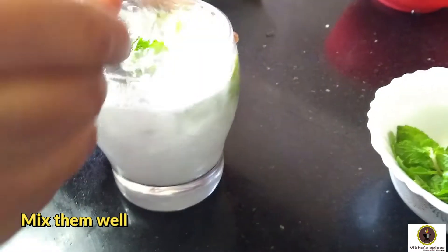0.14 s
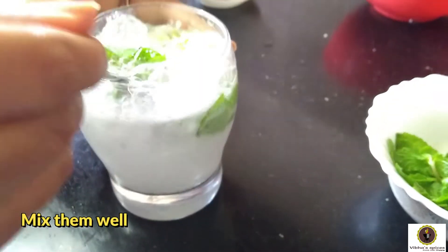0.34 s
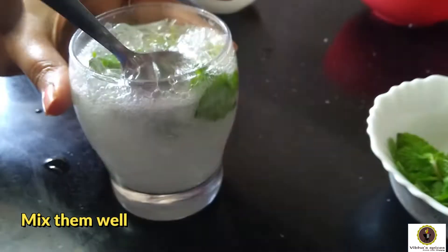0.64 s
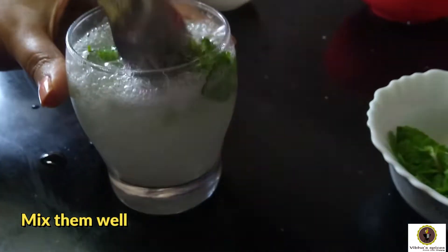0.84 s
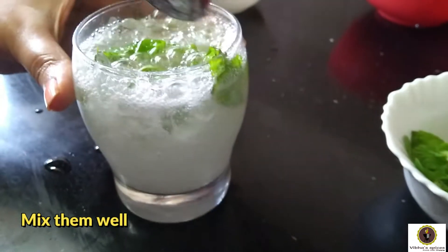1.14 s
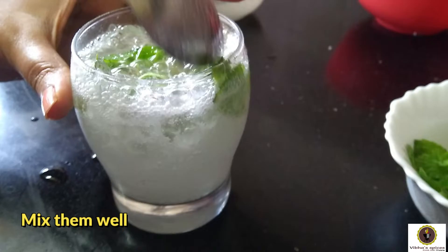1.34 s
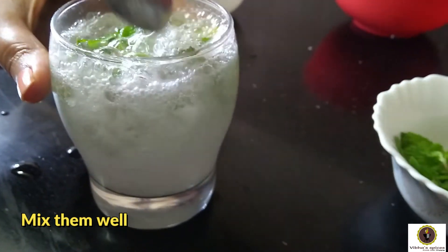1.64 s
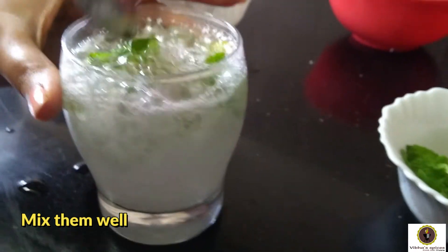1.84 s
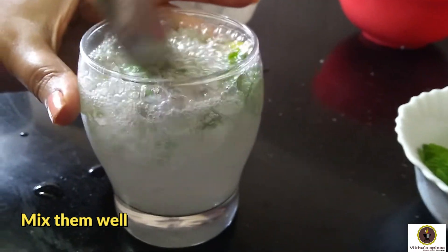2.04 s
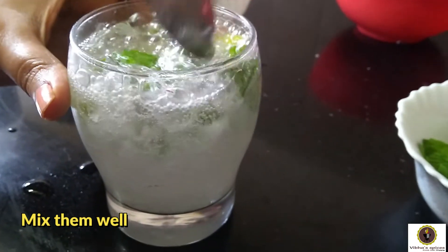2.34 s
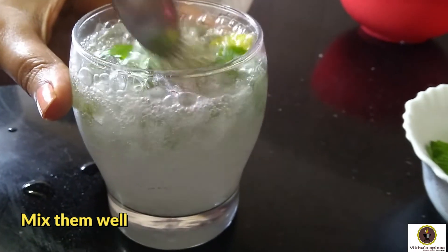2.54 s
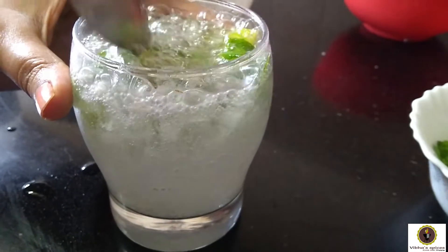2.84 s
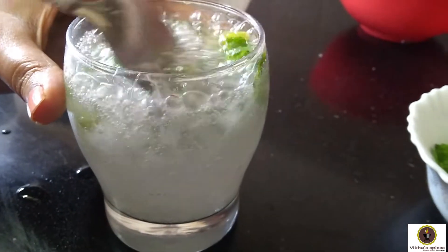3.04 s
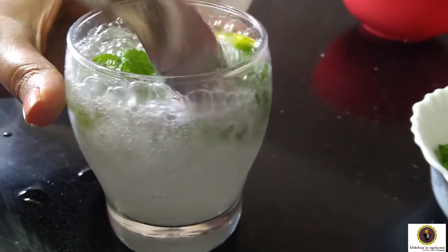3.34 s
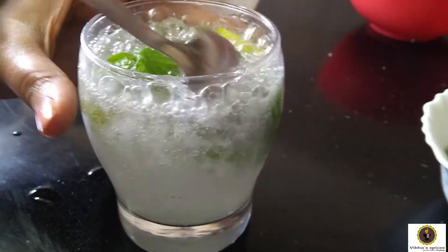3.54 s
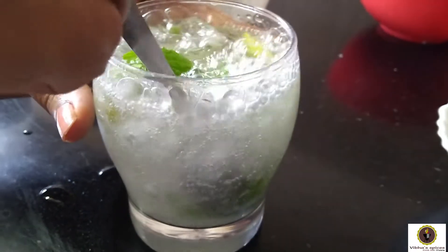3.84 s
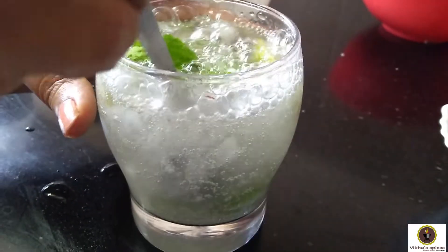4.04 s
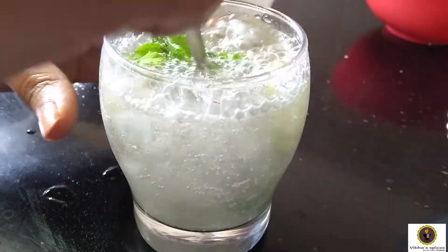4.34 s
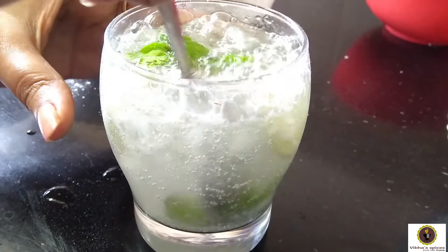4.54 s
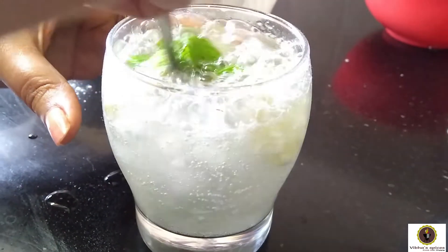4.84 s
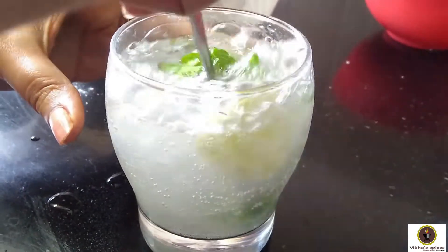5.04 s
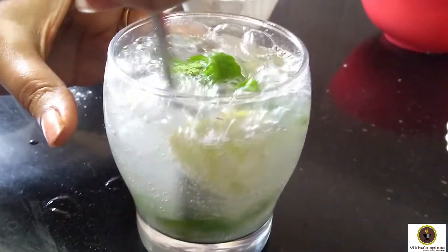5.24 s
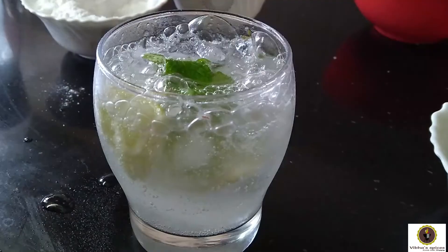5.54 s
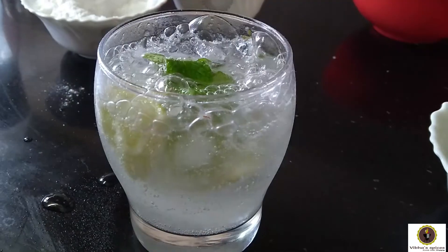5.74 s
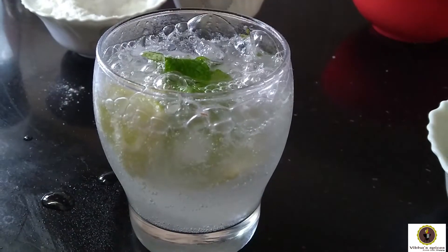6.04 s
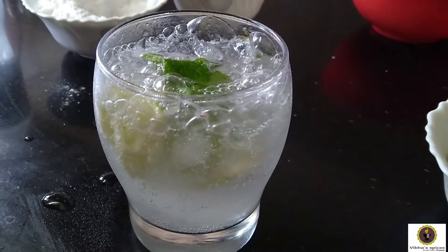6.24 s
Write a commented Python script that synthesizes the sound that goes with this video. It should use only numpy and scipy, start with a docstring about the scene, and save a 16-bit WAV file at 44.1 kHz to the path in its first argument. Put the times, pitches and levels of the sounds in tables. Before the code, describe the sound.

From 0 s a metal spoon pushes through ice and soda in a full glass, very close, with crisp crunching, bubbly slosh and a few clinks, the sharpest near 0.5 and 0.8 s. Foam fizzes constantly in tiny irregular pops over a low wavering hum and rumble. After a calmer second, a tight rattle of ice clinks comes at 1.4-1.5 s, then gulping liquid around 1.9 s, another cluster at 2.4 s and a prominent hard clink at 2.86 s. Rapid small knocks follow at 3.25 s; dull, heavy ice thuds mix with bright clinks at 3.7 and 4.1-4.3 s. A brief thinner spell near 4.5 s gives way to frequent short clinks from 4.75 s onward. A strong low bump lands at 5.41 s, fizz surging; at 5.5 s everything drops abruptly to faint, thin fizz with single pops and soft hum until about 6.4 s.

```python
"""On a kitchen counter, a metal spoon stirs ice, mint and soda in a hand-held glass close to the microphones.
Foam fizzes as random damped pops, ice crunches in crisp ticks and knocks dully on the full glass as short blows
and rings; bubbles slosh and the drink gurgles as longer damped tones, over a low hum of filtered noise. At 5.5
s the scene changes abruptly to the faint fizz of a drink left alone. The recorder widens the stereo image."""
import sys
import numpy as np
from scipy import signal
from scipy.fft import rfft, irfft, next_fast_len
from scipy.io import wavfile
from scipy.ndimage import uniform_filter1d

SR = 44100
rng = np.random.default_rng(int(sys.argv[2]) if len(sys.argv) > 2 else 0)


def wav_record(signal):
    """Record a signal, one row per channel, as 16-bit PCM in the file named by sys.argv[1]."""
    frames = np.transpose(np.atleast_2d(signal))
    bounded = np.clip(frames, -1, 1)
    # unit amplitude maps onto the largest positive 16-bit level
    quanta = np.round(bounded * 32767).astype(np.int16)
    wavfile.write(sys.argv[1], SR, quanta)


N = 282240
TIME = np.arange(N) / SR
DROP_S = 5.495  # the scene changes abruptly to the resting drink
BLUR_DB = -2  # pops too small to tell apart, against the distinct ones


def amp(db):
    """Decibels to gain."""
    return 10 ** (np.asarray(db) / 20)


def unit(x):
    """Scales to rms 1."""
    return x / np.sqrt(np.mean(x ** 2) + 1e-20)


def read(points, hz):
    """Reads a spectrum on a log-frequency axis."""
    f, value = np.transpose(points)
    return np.interp(np.log(hz + 1), np.log(f + 1), value)


def level(table, axis):
    """Gain over time from one dB column of a curve."""
    columns = np.transpose(table)
    return amp(np.interp(TIME, columns[0], columns[axis]))


def add(mix, s, sound):
    """Mixes a sound into both channels at a time in seconds."""
    part = mix[:, max(round(s * SR), 0):][:, :sound.shape[1]]
    part += sound[:, :part.shape[1]]


def colour(x, points, size=2048):
    """Causal (minimum-phase) filter with the given spectrum, built by folding its cepstrum."""
    cepstrum = irfft(np.log(amp(read(points, np.fft.rfftfreq(size, 1 / SR)))))
    cepstrum[1:size // 2] *= 2
    cepstrum[size // 2 + 1:] = 0
    response = irfft(np.exp(rfft(cepstrum)))
    return signal.oaconvolve(x, response[None], axes=1)[:, :x.shape[1]]


def resonate(x, hz, width):
    """A resonance of gain 1 that can follow a pitch curve: shift to 0 Hz, smooth, shift back."""
    turn = np.exp(2j * np.pi * np.cumsum(hz * np.ones(N)) / SR)
    r = np.exp(-np.pi * abs(width) / SR)
    smoothed = signal.lfilter([1 - r], [1, -r], x / turn)
    return 2 * (turn * smoothed).real


def hiss():
    """Stereo white noise: countless pops too small to tell apart, or raw material for hum and room tone."""
    return rng.standard_normal((2, N))


def grains(per_s, spread_db, low_hz, high_hz, cycles, rise, count=28, size=2048):
    """Random bubbles of many sizes: damped tones, some rising in pitch, with its own phase at each microphone."""
    t, out = np.arange(size) / SR, np.zeros((2, N))
    for hz in np.geomspace(low_hz, high_hz, count):
        chance, strength, phase = rng.random(N), rng.exponential(1, N), rng.random((2, 1))
        born = np.flatnonzero(chance < per_s / count / SR)
        train = np.zeros(N)
        train[born] = amp(spread_db * np.minimum(strength[born], 4))
        age = hz * t / cycles
        turns = hz * t * (1 + rise * np.minimum(age, 6)) + phase
        pop = np.exp(-age) * (1 - np.exp(-2 * hz * t)) * np.sin(2 * np.pi * turns)
        out += signal.oaconvolve(train[None], pop * hz, axes=1)[:, :N]
    return unit(out)


def clumps(depth_db, hz=35):
    """Bubbles burst in bunches: a gain that wanders at random."""
    knots = np.arange(0, 8, 1 / hz)
    return amp(depth_db * np.interp(TIME, knots, rng.standard_normal(4096)[:len(knots)]))


def swells(rows, width_hz):
    """Narrow bands of noise around a pitch that swell and fade as half a sine."""
    out = np.zeros((2, N))
    for s, length, db, hz in rows:
        t = np.arange(0, length, 1 / SR)
        band = np.exp(-((np.fft.rfftfreq(SR, 1 / SR) - hz) / (width_hz / 2)) ** 2 / 2)
        churn = unit(irfft(rfft(rng.standard_normal(SR)) * band)[:len(t)])
        add(out, s, (amp(db) * np.sin(np.pi * t / length) * churn)[None])
    return out


def room_floor(floor_db=-65.5):
    """The room's steady floor: noise weighted to the bass."""
    # spectrum of the room tone: f/Hz, level/dB
    floor_spectrum = [(20, 4), (60, -5), (130, 6), (250, -6), (500, -4.5), (1000, -17), (3000, -10),
                      (15000, -34)]
    return amp(floor_db) * unit(colour(hiss(), floor_spectrum))


def rumble(rumble_db=-8.5):
    """A dull rumble: noise with little above the bass."""
    # spectrum of the rumble: f/Hz, level/dB
    rumble_spectrum = [(20, -5.5), (60, -2), (250, -13), (600, -31.5), (3000, -41)]
    return amp(rumble_db) * unit(colour(hiss(), rumble_spectrum))


def hum():
    """A low, wavering hum: noise through narrow resonances, each passed twice for steeper skirts."""
    # resonances of the low hum: f/Hz, width/Hz, level/dB
    resonances = [(97, 4.3, -2.5), (126, 5.7, 0.5), (149.5, 22.3, -2), (167, 36, -12)]
    total = 0
    for hz, width, db in resonances:
        one_pass = 1.48 * width  # two wider passes in a row narrow to about this width
        total = total + amp(db) * unit(resonate(resonate(hiss(), hz, one_pass), hz, one_pass))
    return unit(total)


def resting(fizz_db=9.5, hum_db=11.5, clump_db=1.3):
    """The drink left alone: a thin fizz with single pops, over hum and faint tones."""
    # the resting drink, before the fizz and hum trims: t/s, fizz level/dB, hum level/dB
    rest_levels = [(5.52, -70.5, -96), (5.69, -69.5, -97), (5.76, -66, -74), (5.9, -66, -68),
                   (6.03, -65, -80), (6.16, -70.5, -80), (6.21, -67.5, -65), (6.4, -67.5, -64)]
    # spectrum of the resting fizz: f/Hz, level/dB
    rest_spectrum = [(200, -30), (450, 0), (700, -11), (1150, -6), (1400, -2), (1650, -10), (1900, -14),
                     (2600, -5), (3500, -17), (4500, 2), (5600, 3.5), (7000, 1.5), (9500, -4.5),
                     (12000, -14.5), (15000, -25)]
    # faint tones that come and go behind it: t/s, length/s, level/dB, f/Hz
    faint_tones = [(5.80, .12, -76, 1010), (5.92, 0.091, -75, 950), (5.93, 0.22, -71, 1370),
                   (5.98, .14, -68.5, 452), (6.22, 0.046, -70, 460), (6.34, .08, -74, 543)]
    pops = grains(per_s=2000, spread_db=1.5, low_hz=2400, high_hz=15700, cycles=4.3, rise=0.0081)
    foam = unit(colour(pops + amp(BLUR_DB) * hiss(), rest_spectrum))
    background = amp(hum_db) * level(rest_levels, axis=2) * hum() + swells(faint_tones, width_hz=67)
    return amp(fizz_db) * level(rest_levels, axis=1) * clumps(clump_db) * foam + background


def kitchen(x, room_db=-9.0, t60=0.27):
    """Sparse reflections from counter and walls, random at each microphone and dying away over t60 seconds."""
    t = np.arange(SR // 3) / SR
    sparse = rng.standard_normal((2, len(t))) * (rng.random((2, len(t))) < .06)
    taps = sparse * (t > .004) * amp(-60 * t / t60)
    taps /= np.linalg.norm(taps, axis=1, keepdims=True)
    return x + amp(room_db) * signal.oaconvolve(x, taps, axes=1)[:, :N]


def glass(x):
    """The glass rings on faintly after everything that happens in it."""
    # what the full glass rings with, whatever stirs it: f/Hz, width/Hz, level/dB
    glass_rings = [(363, 7, 10), (389, 7, 13), (485, 16, 5), (804, 10, 1), (874, 10, -1), (1103, 18, 1),
                   (1490, 30, -7), (1717, 30, -14), (2558, 30, -9), (3323, 30, -9), (5403, 80, -16)]
    return x + sum(amp(db) * resonate(x, hz, width) for hz, width, db in glass_rings)


def pushes(part, axis, start_s=0.018):
    """Gain over time of one part of the drink: each push rises, holds while the spoon moves, then settles."""
    # pushes of the spoon: t/s, length/s, ice crunch level/dB, slosh level/dB, gurgle level/dB
    strokes = [(0.0, 0.24, -38.5, -48, -82), (0.132, 0.17, -35.5, -44.5, -73.5),
               (0.442, 0.29, -42.5, -47.5, -55.5), (0.74, 0.12, -42, -43.5, -53),
               (0.931, 0.095, -39.5, -87.5, -54), (1.38, 0.13, -31.5, -43.5, -53.5),
               (1.51, 0.21, -40, -48.5, -61), (1.661, 0.079, -36.5, -41, -51),
               (1.852, 0.16, -39.5, -46.5, -54), (1.993, 0.65, -46.5, -51.5, -64.5),
               (2.385, 0.085, -32, -40.5, -55), (2.486, 0.22, -49, -51.5, -55.5),
               (2.796, 0.16, -38, -50, -52.5), (2.986, 0.067, -32.5, -47, -50),
               (3.234, 0.039, -31.5, -47.5, -54.5), (3.314, 0.21, -42, -43, -62),
               (3.58, 0.1, -40, -46, -59), (3.683, 0.097, -35, -46.5, -50.5),
               (4.067, 0.15, -33.5, -39, -63), (4.18, 0.11, -48, -42.5, -64), (4.37, 0.13, -88, -78, -54.5),
               (4.709, 0.052, -40, -49.5, -52.5), (4.805, 0.042, -35, -45.5, -67),
               (4.948, 0.13, -36, -40, -69), (5.13, 0.1, -38, -47, -82), (5.29, 0.078, -35, -41, -56),
               (5.416, 0.029, -31, -36, -43.5)]
    idle_db, settle_db_per_s = part
    power = np.full(N, amp(idle_db) ** 2)
    for row in strokes:
        age = TIME - row[0]
        going = np.clip(age / start_s, 0, 1)  # the spoon takes start_s to get going
        settled_db = settle_db_per_s * np.maximum(age - row[1], 0)
        power += (going * amp(row[1 + axis] - settled_db)) ** 2
    return np.sqrt(power)


def gulps(rise=0.25):
    """Now and then the spoon sets off a low, damped note that rises slightly in pitch."""
    # gulps and dull bumps as the spoon pushes through: t/s, level/dB, starting f/Hz, t60/s
    bumps = [(0.07, -51.5, 786, 0.5), (0.52, -41, 489.4, 0.055), (1.92, -41, 630, 0.041),
             (2.406, -32.5, 329, 0.075), (3.421, -41.5, 510, 0.077), (3.701, -36, 148, 0.2),
             (3.786, -37, 409, 0.12), (3.81, -45, 510, .07), (4.964, -34.5, 1100, 0.17),
             (5.41, -16, 121.6, 0.043), (5.411, -17, 316, 0.02), (5.41, -19, 635, 0.0097)]
    t, out = np.arange(SR // 4) / SR, np.zeros((2, N))
    for s, db, hz, t60 in bumps:
        phase = 2 * np.pi * (hz * t * (1 + rise * t) + rng.random())
        note = amp(db - 60 * t / t60) * (1 - np.exp(-hz * t)) * np.sin(phase)
        add(out, s, note[None])
    return out


def glugs():
    """Blurred glugs as liquid closes behind the spoon: swelling bands of noise."""
    # the glugs: t/s, length/s, level/dB, f/Hz
    closings = [(0.0, 0.18, -56, 830), (1.67, 0.14, -53, 540), (1.72, 0.16, -56, 723),
                (1.9, 0.045, -49.5, 576), (1.905, 0.042, -45, 400), (2.969, 0.16, -45.5, 468),
                (2.98, 0.22, -45.5, 381), (2.397, 0.066, -51.5, 395), (3.68, 0.091, -50.5, 481.6),
                (4.053, 0.085, -49.5, 542)]
    return swells(closings, width_hz=78)


def gurgle(effort, gurgle_db=-2.5):
    """The liquid swirls round the spoon: low bubbles that ring for several cycles."""
    # spectrum of the gurgle: f/Hz, level/dB
    gurgle_spectrum = [(120, -39.5), (230, 7), (300, -3), (380, 2), (480, 6), (620, -10), (800, -2),
                       (1200, -32.5)]
    swirl = grains(per_s=320, spread_db=2.0, low_hz=230.7, high_hz=950.0, cycles=12.1, rise=0.0019, size=8192)
    return amp(gurgle_db) * effort * unit(colour(swirl, gurgle_spectrum))


def slosh(effort, slosh_db=-0.5, hiss_db=-6.5, pocket_db=5.0, wander_db=0.42):
    """Middle-sized bubbles ring in the air pocket that opens and closes behind the spoon."""
    # spectrum of the slosh: f/Hz, level/dB
    slosh_spectrum = [(300, -32), (650, 11), (800, -10.5), (950, -6.5), (1150, -5.5), (1450, -0.5),
                      (1900, 5), (2500, 9), (4000, -19)]
    # resonance of the air pocket: t/s, f/Hz, width/Hz
    air_pocket = [(0.0, 1690, 450), (0.32, 1700, 450), (0.67, 1400, 200), (0.8, 1800, 400),
                  (1.45, 1360, 500), (1.75, 1407, 300), (2.2, 1404, 250), (2.45, 1530, 220),
                  (2.7, 1426, 120), (3.15, 1404, 250), (3.28, 1650, 450), (3.55, 1620, 400),
                  (3.75, 1200, 400), (3.99, 1460, 400), (4.15, 1120, 400), (4.29, 1210, 400),
                  (4.85, 1570, 400), (4.98, 1210, 250), (5.18, 1740, 400), (5.45, 1430, 500)]
    bubbles = grains(per_s=700, spread_db=3.0, low_hz=724.0, high_hz=2800, cycles=23.0, rise=0.0092)
    wet = colour(bubbles + amp(hiss_db) * hiss(), slosh_spectrum)
    times, pitches, widths = np.transpose(air_pocket)
    pocket_hz = np.interp(TIME, times, pitches) * clumps(wander_db, hz=12)  # the gain wanders the pitch
    # a crossfade from the narrowest to the widest resonance follows the width
    openness = (np.interp(TIME, times, widths) - widths.min()) / np.ptp(widths)
    narrow = unit(resonate(wet, pocket_hz, widths.min()))
    wide = unit(resonate(wet, pocket_hz, widths.max()))
    pocket = amp(pocket_db) * ((1 - openness) * narrow + openness * wide)
    return amp(slosh_db) * effort * unit(unit(wet) + pocket)


def fizz(ice, foam_db=1.5, snap_db=-9.5, clump_db=1.5, stirred_db=-7):
    """Tiny bubbles burst in the foam, louder when it is stirred; larger skins snap singly."""
    # spectrum of the foam: f/Hz, level/dB
    fizz_spectrum = [(1500, -22.5), (3000, -7), (4300, -1.5), (5500, 1.5), (6800, -0.5), (8000, -3.5),
                     (9500, -8), (11000, -14.5), (13000, -19), (15000, -29)]
    # liveliness of the foam, before the foam trim: t/s, level/dB
    liveliness = [(0.0, -40.5), (0.93, -40.5), (1.05, -43.5), (1.34, -42.5), (1.58, -39.5), (1.71, -41.5),
                  (2.26, -43.5), (2.89, -39.5), (3.1, -45), (3.55, -43), (4.63, -47), (5.26, -44.5),
                  (5.34, -38.5), (5.4, -37)]
    pops = grains(per_s=3500, spread_db=2.5, low_hz=2457, high_hz=15300, cycles=3.4, rise=0.012)
    snaps = grains(per_s=210, spread_db=4.0, low_hz=3170, high_hz=9600, cycles=2.0, rise=0)
    foam = unit(colour(pops, fizz_spectrum))
    foam = foam + amp(snap_db) * unit(colour(snaps, fizz_spectrum))
    foam = foam + amp(BLUR_DB) * unit(colour(hiss(), fizz_spectrum))
    # stirred_db: extra fizz set free, relative to the gain of the pushes on the ice
    bursting = np.hypot(amp(foam_db) * level(liveliness, axis=1), amp(stirred_db) * ice)
    return bursting * clumps(clump_db) * unit(foam)


def crunch(ice, crunch_db=-4.0):
    """Ice and foam grind against the spoon in small, crisp ticks."""
    # spectrum of the crunch: f/Hz, level/dB
    crunch_spectrum = [(900, -30), (1800, -22.5), (2600, 6.5), (3400, -0.5), (4200, 6.5), (5200, -3.5),
                       (8000, -38), (14000, -43.5)]
    ticks = grains(per_s=2200, spread_db=2.6, low_hz=1800, high_hz=8150, cycles=3.5, rise=0.0096)
    return amp(crunch_db) * ice * unit(colour(ticks + amp(BLUR_DB) * hiss(), crunch_spectrum))


def thuds(cycles=10.5, clatter_db=-12.0, clatter_t60=0.049):
    """A submerged cube gives a few heavily damped cycles (60 dB down after `cycles`) and a brief clatter."""
    # ice knocking dully under the surface: t/s, level/dB, f/Hz
    dull_knocks = [(1.42, -37, 1420), (1.4635, -40, 1450), (1.47, -32, 1110), (1.508, -38, 1493),
                   (1.535, -44, 1310), (3.6995, -24.5, 1190), (4.09, -31, 1350), (4.1032, -40, 1157),
                   (4.107, -40, 1300), (4.113, -30, 1240), (4.1156, -34, 1060), (4.1935, -21.5, 1190),
                   (4.198, -29.5, 1100), (4.222, -19, 1040), (4.229, -38, 950), (4.2527, -25.5, 1030),
                   (4.2562, -31, 1090), (4.271, -24, 1410), (4.275, -37, 1420), (4.9618, -42, 1140),
                   (4.968, -31, 1120), (4.975, -33, 1190), (5.021, -40, 1110), (5.056, -36, 1150),
                   (5.4091, -26, 1030)]
    t, out = np.arange(6000) / SR, np.zeros((2, N))
    for s, db, hz in dull_knocks:
        blow = amp(-60 * hz * t / cycles) * (1 - np.exp(-4 * hz * t)) * np.sin(2 * np.pi * hz * t)
        band = signal.butter(2, [hz * 0.8, hz * 1.6], "bandpass", fs=SR, output="sos")
        noise = unit(signal.sosfilt(band, rng.standard_normal((2, len(t)))))
        clatter = noise * amp(clatter_db - 60 * t / clatter_t60)
        add(out, s, amp(db) * (blow + clatter))
    return out


def jostles(ice, per_s=45, above_ice_db=3.5, spread_db=2.5, ring_hz=4900, ring_octaves=0.25,
            tone_spread_db=-8.5, count=400):
    """Small random knocks of ice, likelier and harder the more it is pushed; per_s holds at the hardest push."""
    rows = []  # t/s, level/dB, ring f/Hz, low body/dB, bright edge/dB
    for (when, chance), (force, pitch, low, edge) in zip(rng.random((count, 2)), rng.standard_normal((count, 4))):
        s = when * DROP_S
        push = ice[int(s * SR)]
        if chance < per_s * DROP_S / count * push / ice.max():
            db = 20 * np.log10(push) + above_ice_db + spread_db * force
            hz = ring_hz * 2 ** (ring_octaves * pitch)
            rows.append((s, db, hz, tone_spread_db * low, tone_spread_db * edge))
    return rows


def clinks(knocks, snap_db=-14.0, crack_db=-6.0, ring_db=-2.0, rattle_db=-9.0, contact_s=0.0003,
           ring_cycles=34.6, rattle_t60=0.048, rattle_spread_db=3.5):
    """A hard snap, a short crack and a ring choked by liquid and hand, then a grainy rattle of jostled ice."""
    # spectrum of a knock on the full glass: f/Hz, level/dB
    knock_spectrum = [(100, -8), (500, -33), (800, -31), (1100, -18.5), (1900, -2.5), (2650, 2),
                      (3500, -0.5), (4400, 2), (5800, 1), (7500, -4.5), (10000, -16.5), (15000, -30.5)]
    t, out = np.arange(4096) / SR, np.zeros((2, N))
    since = np.maximum(t - contact_s, 0) / contact_s
    blow = (since / 2) ** 2 * np.exp(2 - since)
    onset = 1 - np.exp(-(since / 2) ** 4)
    age = np.maximum(t - t[np.argmax(blow)], 0)
    impulse = 1. * (np.arange(len(t)) == np.argmax(blow))
    nearer = np.array([[0], [1]])  # snap and ring go to the right microphone alone
    for s, db, hz, low, edge in knocks:
        noise = rng.standard_normal((4, len(t)))
        bounces = np.repeat(rng.standard_normal(128), 32)  # random level steps, 32 samples each
        hardness = [(500, 0.011), (1000, low), (1900, low), (2800, 0.015), (4400, 0.0013), (6500, edge)]
        body = [(f, gain + read(hardness, f)) for f, gain in knock_spectrum]
        settling = onset * amp(rattle_spread_db * bounces - 60 * t / rattle_t60)
        struck = colour(np.vstack([impulse, noise[:2] * blow]), body, size=512)
        rattling = colour(noise[2:] * settling, knock_spectrum, size=512)
        parts = np.vstack([struck, rattling])
        parts *= np.sqrt(.002 * SR) / np.linalg.norm(parts, axis=1, keepdims=True)  # energy of rms 1 over 2 ms
        snap, crack, rattle = parts[:1], parts[1:3], parts[3:]
        # 60 dB down after ring_cycles, so low notes last longer
        ring = onset * amp(-60 * hz * age / ring_cycles) * np.sin(2 * np.pi * hz * t)
        direct = amp(snap_db) * snap + 2 * amp(ring_db) * ring
        add(out, s, amp(db) * (nearer * direct + amp(crack_db) * crack + amp(rattle_db) * rattle))
    return out


def stirring(hum_db=11.5):
    """The spoon at work: its pushes drive every part of the drink, over a low hum and rumble."""
    # spoon and ice knocking on the glass: t/s, level/dB, ring f/Hz, low body/dB, bright edge/dB
    glass_knocks = [(0.1439, -22.5, 5830, 12, 11.5), (0.212, -27, 5500, 3, 2.5),
                    (0.4362, -24.5, 5940, 1, -17), (0.5279, -16, 3870, 7.5, -11.5),
                    (0.7654, -13.5, 2400, 19, -2), (1.391, -24, 2642, 11, 0), (1.4083, -19, 4820, 4.5, -4),
                    (1.4418, -13, 5000, 0, -4), (1.447, -18, 5300, 11, -7), (1.4582, -12, 4320, -3, -2),
                    (1.4635, -26, 3920, 12, -6), (1.4775, -19, 5440, -2, -2), (1.5337, -17.5, 4400, 0, 4),
                    (1.541, -28, 3740, -2, -4), (1.896, -28, 5160, 10, -5), (2.0639, -14.5, 8130, -11, 9),
                    (2.0994, -25.5, 7250, -8, 4), (2.4016, -18.5, 2400, 18, -10),
                    (2.4175, -16.5, 4650, 6.5, -4), (2.4225, -22, 4080, 0, -4), (2.437, -24, 3840, -6, -1),
                    (2.4398, -30, 5600, -3, -1), (2.4808, -23, 3780, 14, -14), (2.817, -27, 5700, -10, -2),
                    (2.4449, -16, 5800, 0.5, -3), (2.831, -29, 5640, -12, 2), (2.8382, -34, 6840, -8, 10),
                    (2.8232, -19.5, 5200, -23, 5), (2.844, -24, 5370, -21, 10),
                    (2.8599, -7.5, 2937, -1.5, -8), (2.8815, -22, 5700, -17, -11),
                    (2.8985, -37, 4060, 1, -11), (2.918, -24, 5400, -2, -4.5), (2.973, -23, 4130, -27, 1),
                    (3.0929, -16, 5160, -2, -10), (3.2468, -26.5, 5070, -8, 9.5),
                    (3.2525, -27, 5200, -10, 0), (3.258, -17, 5900, -6, 4), (3.261, -19, 3810, 2, -2),
                    (3.2695, -25, 3800, -10.5, -1), (3.2818, -20, 3900, -23, 4),
                    (3.2875, -21, 3930, -8, -0.5), (3.2915, -18.5, 4020, -10, -5),
                    (3.2975, -28, 3780, -8, 0), (3.379, -24.5, 5430, 2, 3), (3.36, -19.5, 3600, 9, -6),
                    (3.5365, -24, 5640, 9, 11), (3.6986, -14.5, 2490, 29, -6), (3.7499, -14.5, 2800, 5, 1),
                    (3.8838, -22.5, 3990, -18, -1), (4.0802, -16, 3366, 0, -18),
                    (4.1564, -19, 4060, -6, -1), (4.1932, -21.5, 3800, 2, 8), (4.1972, -15.5, 4630, 13, 6),
                    (4.2215, -12, 2800, 11, -9), (4.2285, -32, 3620, 7, -13), (4.2515, -27, 3300, 4, -3),
                    (4.2745, -24.5, 3370, -3, -10), (4.3017, -17, 4900, 4, -8),
                    (4.3092, -26.5, 3420, 10, -9), (4.5085, -25.5, 3500, -38, -24),
                    (4.7605, -17, 3780, 1, -2), (4.8403, -19, 4600, -18, -24),
                    (4.8595, -21, 4330, -0.5, -23), (4.8677, -15.5, 4260, -3, 5),
                    (4.913, -22.5, 4460, 2, -3), (4.9612, -21, 1490, 3, -15), (4.9643, -19.5, 1840, 1, -18),
                    (4.968, -18.5, 3630, 12, -21), (5.0197, -20.5, 4660, 5.5, -8),
                    (5.039, -28, 3440, -1, 2), (5.0526, -21.5, 3160, 3, -6), (5.057, -25.5, 3380, 0, -5),
                    (5.0734, -22.5, 4450, -7, 3), (5.1104, -18.5, 3200, 3, 13),
                    (5.1132, -17.5, 3180, -7.5, -7), (5.1172, -23.5, 3340, -3, -14),
                    (5.1498, -21.5, 4400, -3, 7), (5.1836, -19.5, 5270, 8, 12),
                    (5.2391, -22, 5240, -26, -15), (5.2805, -27, 5600, -7.5, 1), (5.288, -27, 5730, -10, 2),
                    (5.3054, -25.5, 5480, -4, -6), (5.3124, -21.5, 5450, -6, 6), (5.3478, -24, 5500, -7, 1),
                    (5.333, -23, 6550, 7, -1), (5.378, -18.5, 5600, 0, 4), (5.362, -23, 3960, -7, 0),
                    (5.4098, -15.5, 4000, 10, -11), (5.4775, -24.5, 5280, 1, -11.5)]
    # level of the low hum and rumble, before their trims: t/s, level/dB
    low_level = [(0.0, -48.5), (0.59, -50.5), (0.7, -54.5), (1.24, -56.5), (1.59, -46), (1.65, -55),
                 (1.71, -50.5), (1.98, -51.5), (2.27, -46.5), (3.07, -51), (3.13, -64.5), (3.69, -55),
                 (4.38, -52), (4.65, -72), (4.71, -63.5), (4.93, -71), (4.99, -54.5), (5.48, -46.5)]
    # how the ice answers a push: level between pushes/dB, settling/(dB per s)
    ice_answer = (-47, 130)
    # how the surface answers: level between pushes/dB, settling/(dB per s)
    surface_answer = (-59.5, 129)
    # how the depths answer: level between pushes/dB, settling/(dB per s)
    depths_answer = (-61, 140)
    ice = pushes(ice_answer, axis=1)
    surface = pushes(surface_answer, axis=2)
    depths = pushes(depths_answer, axis=3)
    drink = fizz(ice) + crunch(ice) + slosh(surface) + gurgle(depths)
    drink = drink + thuds() + clinks(list(glass_knocks) + jostles(ice))
    low = amp(hum_db) * hum() + rumble()
    return kitchen(glass(drink) + gulps() + glugs()) + level(low_level, axis=1) * low


def scene():
    """Stirring, then an abrupt change of scene to the resting drink, over the room's floor."""
    at_rest = np.clip((TIME - DROP_S) / 0.011 + .5, 0, 1)  # 11 ms crossfade
    return (1 - at_rest) * stirring() + at_rest * resting() + room_floor()


def widening(x, ease=0.29):
    """Strength of the widener over time: it eases off while a sharp peak stands above the running level."""
    power = (x ** 2).mean(0)
    fast = abs(uniform_filter1d(power, size=256)) + 1e-14
    slow = abs(uniform_filter1d(power, size=8192)) + 1e-14
    return 1 - ease * np.clip(np.log10(fast / slow / 2) * 2, 0, 1)


def record(dry, crossfeed_s=.000445, ease_above_hz=440, edge_hz=15400):
    """Two close microphones share the bass; a widener subtracts a late copy of each from the other; band limit."""
    # likeness of the two microphones: f/Hz, correlation (-1 to 1)
    likeness = [(60, 0.99), (150, 0.82), (280, 0.54), (450, 0.78), (800, 0), (1300, -0.1), (2000, -0.15),
                (2700, -0.64), (4000, 0.04), (15000, -0.1)]
    # level difference as the glass stands off-centre between the microphones: f/Hz, left minus right/dB
    nearness = [(150, 0), (1000, 7), (4000, -1.5), (8000, -3), (15000, -3)]
    # share of the opposite channel that the widener subtracts: f/Hz, level/dB
    crossfeed = [(100, -1), (2100, 0), (2400, 0), (3450, -.7), (4600, -4.5), (5700, -5.3), (6800, -11),
                 (8000, -17), (15000, -24)]
    # balance of the two output channels: f/Hz, left minus right/dB
    balance = [(150, 2), (500, 0), (1150, 0), (1550, 1), (1950, 0), (2450, 0), (2650, -1), (2900, 1),
               (3450, .5), (4100, -6), (4900, 3), (5400, .3), (6100, 3), (7000, 0), (9000, -.5),
               (11500, -4), (14500, 1.5)]
    size = next_fast_len(N + 4096)
    hz, z = np.fft.rfftfreq(size, 1 / SR), rfft(dry, size)
    sides = np.array([[.5], [-.5]])
    angle = np.arcsin(np.clip(read(likeness, hz), -1, 1)) / 2
    z = (np.cos(angle) * z + np.sin(angle) * z[::-1]) * amp(sides * read(nearness, hz))
    eased = rfft(irfft(z, size)[::-1, :N] * (1 - widening(dry)), size)
    # the easing acts mostly above ease_above_hz: the deep bass stays fully widened
    opposite = z[::-1] - eased * hz ** 2 / (hz ** 2 + ease_above_hz ** 2)
    share = amp(np.minimum(read(crossfeed, hz), 0))
    late = np.exp(-2j * np.pi * hz * crossfeed_s)
    z = (z - share * late * opposite) / np.sqrt(1 + share ** 2)
    z = z * amp(sides * read(balance, hz))
    low_pass = signal.firwin(255, edge_hz, window=("kaiser", 8), fs=SR)
    return signal.oaconvolve(irfft(z, size)[:, :N], low_pass[None], "same", axes=1)


dry = scene()
out = record(dry)
wav_record(out)
```